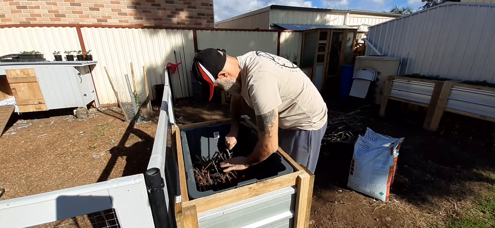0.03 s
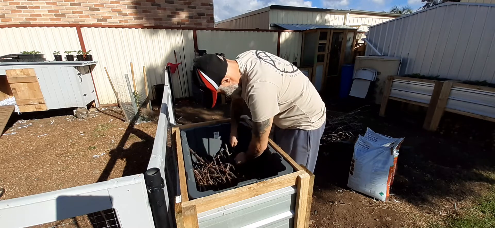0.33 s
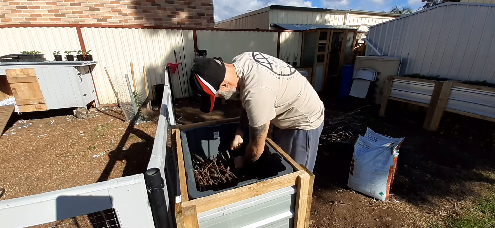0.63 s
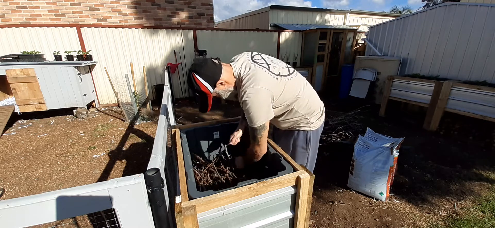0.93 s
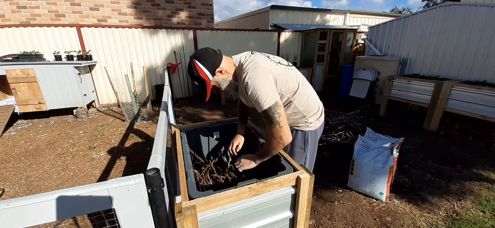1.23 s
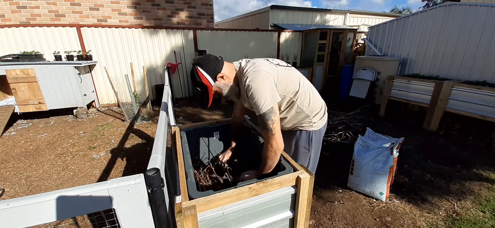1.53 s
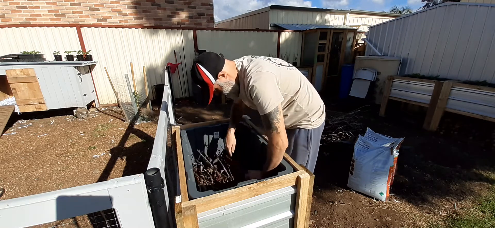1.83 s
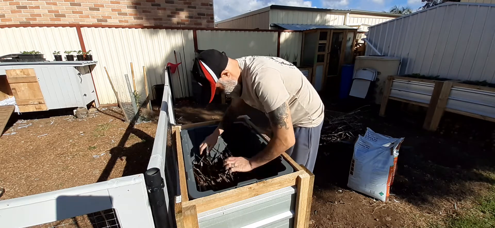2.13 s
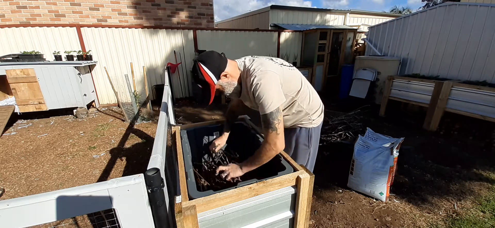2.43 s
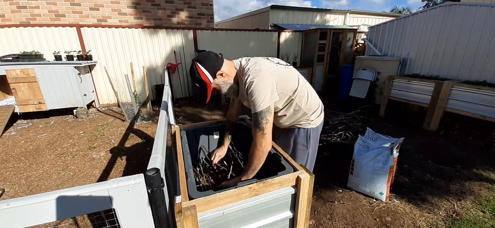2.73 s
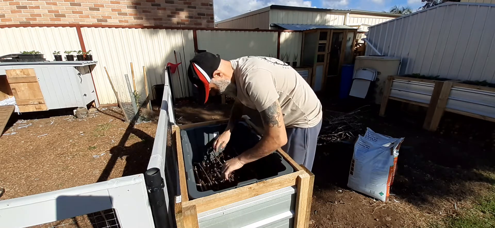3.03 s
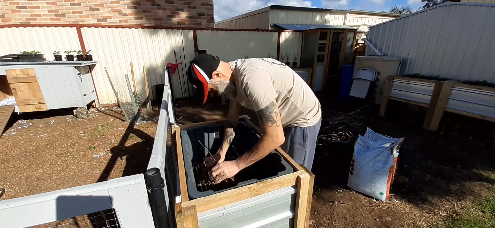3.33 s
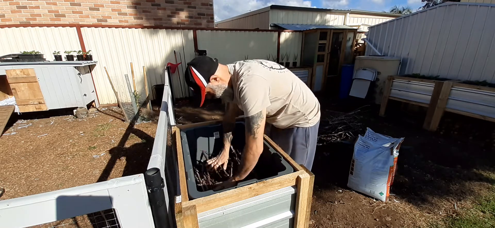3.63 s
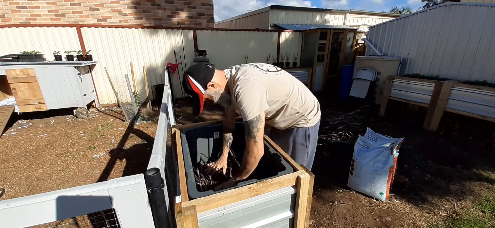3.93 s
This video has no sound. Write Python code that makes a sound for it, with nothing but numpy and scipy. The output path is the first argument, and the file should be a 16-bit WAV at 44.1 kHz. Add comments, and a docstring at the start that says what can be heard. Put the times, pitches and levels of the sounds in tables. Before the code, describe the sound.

In a quiet yard, hands shift a pile of sticks, which knock, scrape and crackle over the dull boom of a raised garden bed. A brief squeak comes past the middle. The sound sits a little left in stereo.

```python
"""Dry litter rustles and sticks clatter as hands rummage in a lined, raised garden bed outdoors.
The hollow bed booms under the shifting pile and bark rasps as it rubs. Sticks knock and ring,
twigs snap, and sliding sticks judder and, later, squeak. The walls scatter the sounds briefly.
The bed stands in a quiet yard, a little to the left of a stereo pair of microphones."""
import sys
import numpy as np
from scipy import signal
from scipy.io import wavfile
from scipy.ndimage import uniform_filter1d

SR = 44100
rng = np.random.default_rng(int(sys.argv[2]) if len(sys.argv) > 2 else 0)


def master_out(mix):
    """Clip the mix to full scale and print it as 16-bit PCM to the path in sys.argv[1]."""
    frames = np.transpose(np.atleast_2d(mix))
    ceiling = np.clip(frames, -1, 1)
    pcm = np.round(ceiling * 32767).astype(np.int16)
    wavfile.write(sys.argv[1], SR, pcm)


N = 176400
TIME = np.arange(N) / SR
LEFT_LEAD_S, LEFT_LOUDER_DB, LEFT_TREBLE_DB = 0.00011, 3, 2.5  # left microphone against right


def from_db(db):
    """Decibels to gain."""
    return 10 ** (np.asarray(db) / 20)


def unit_rms(x):
    """Scale to rms 1."""
    return x / np.sqrt(np.mean(x ** 2) + 1e-20)


def band(x, low_hz, high_hz):
    """Second-order band-pass."""
    high_hz = min(high_hz, .47 * SR)
    low_hz = min(low_hz, high_hz / 2 ** .25)
    return signal.sosfilt(signal.butter(2, [low_hz, high_hz], "band", fs=SR, output="sos"), x + 1e-18)


def resonance(x, hz, width_hz):
    """Two-pole resonance with gain 1 at its peak."""
    r = np.exp(-np.pi * width_hz / SR)
    feedback = [1, -2 * r * np.cos(2 * np.pi * hz / SR), r * r]
    return signal.lfilter(np.array([1, 0, -1]) * (1 - r * r) / 2, feedback, x + 1e-18)


def coloured(excite, spectrum):
    """Half-octave bands over the span of a spectrum, each with its own excitation; rms 1."""
    hz, db = np.transpose(spectrum)
    edges = 22 * 2 ** np.arange(0, 10.1, .5)
    out = 0
    for low, high in zip(edges, edges[1:]):
        if high > hz[0] and low < hz[-1]:
            band_db = np.interp(np.log(low * high) / 2, np.log(hz), db)
            out = out + from_db(band_db) * band(excite(), low, high)
    return unit_rms(out)


def add(out, start, sound):
    """Mix a sound in at a time in seconds."""
    i = max(int(start * SR), 0)
    out[i:i + len(sound)] += sound[:max(N - i, 0)]


def level_curves(rows):
    """Join timed levels into one curve for each level column."""
    times, *levels = np.transpose(rows)
    return [np.interp(TIME, times, db) for db in levels]


def shower(per_s, spread_db):
    """Random impulses: many small ones, a few large."""
    return (rng.random(N) < per_s / SR) * from_db(spread_db * np.minimum(rng.exponential(1, N), 4))


def evened(x, window_s):
    """Hold the slow level at 1 and keep the grain."""
    size = int(window_s * SR)
    power = uniform_filter1d(uniform_filter1d(np.mean(x ** 2, axis=0), size), size)
    return x / np.sqrt(np.abs(power) + 1e-6)


def at_microphones(x):
    """The direct sound reaches the left microphone first."""
    return np.array([x, np.roll(x, round(LEFT_LEAD_S * SR))])


# The hollow bed's resonances. Each row: frequency in Hz, width in Hz, lift in dB.
BED_MODES = [(92, 17.6, 5), (185, 49, 5), (322, 10.5, 2), (540, 6.8, 5), (739, 35, 6), (1157, 31, 3.5)]


def in_bed(x, scatter_db, t60):
    """The bed colours a sound; its walls scatter it, alike at both microphones only in the lower range."""
    x = x + sum((from_db(db) - 1) * resonance(x, hz, width) for hz, width, db in BED_MODES)
    t = TIME[:SR // 3]
    noise = rng.standard_normal((3, len(t))) * from_db(-60 * t / t60)
    tail = (band(noise[0], 111, 1300) + band(noise[1:], 790, 2600)) / np.sqrt(np.sum(noise[0] ** 2))
    scattered = signal.fftconvolve(x[None], tail, axes=1)[:, :N]
    return at_microphones(x) + from_db(scatter_db) * scattered


def fibre_hiss():
    """Noise of dry fibres: a direct part, and a scattered part that differs at each microphone."""
    return at_microphones(rng.standard_normal(N)) + rng.standard_normal((2, N))


def friction(spectrum, per_s, spread_db, t60, tint_db):
    """Every slip frees a short, dying burst of noise with a colour of its own."""
    slips = shower(per_s, spread_db)

    def bursts():
        sizes = slips.copy()
        sizes[slips > 0] *= from_db(tint_db * rng.standard_normal(np.count_nonzero(slips)))
        power = signal.lfilter([1], [1, -from_db(-120 / (t60 * SR))], sizes ** 2 + 1e-18)
        return np.sqrt(power) * fibre_hiss()
    return evened(coloured(bursts, spectrum), window_s=0.047)


# The colours of bark and of litter. Each row: frequency in Hz, relative spectral density in dB.
RASP_SPECTRUM = [(800, -16), (1250, 1), (1900, -3.5), (2600, -7.5), (3400, -15), (5000, -23.5)]
RUSTLE_SPECTRUM = [(2400, -2.5), (3800, 4), (9500, -4), (12500, 5), (16000, -7)]
# How hard things rub. Each row: time in seconds, relative levels of rasp and of rustle in dB.
RUBBING_LEVELS = [(0.0, -48, -55), (.2, -70, -69), (0.305, -60, -67), (0.315, -46, -61), (0.47, -68, -74),
                  (0.77, -45, -43), (0.82, -58, -65), (0.95, -53, -56), (1.35, -80, -83), (1.41, -50, -51),
                  (1.58, -45, -53), (1.64, -34, -42), (1.7, -32, -44), (1.81, -49.5, -55), (2.08, -57, -61),
                  (2.19, -71, -73), (2.22, -59, -60), (2.47, -46, -52), (2.62, -52, -63), (2.71, -39, -46),
                  (2.82, -41, -47.5), (2.86, -55, -61), (2.99, -47, -53), (3.27, -69, -74),
                  (3.28, -53.5, -53.5), (3.46, -60.5, -66), (3.69, -37, -43.5), (3.77, -50, -55),
                  (3.84, -42, -44), (3.915, -48, -55), (3.93, -44, -42), (3.97, -35, -42), (4.0, -49, -52)]


def rubbing():
    """Bark rasps and litter rustles in hundreds of tiny slips a second."""
    rasp_db, rustle_db = level_curves(RUBBING_LEVELS)
    rasp = friction(RASP_SPECTRUM, per_s=300, spread_db=2.7, t60=0.062, tint_db=6)
    rustle = friction(RUSTLE_SPECTRUM, per_s=450, spread_db=3.5, t60=0.12, tint_db=5)
    return from_db(rasp_db + 1) * rasp + from_db(rustle_db + 3.5) * rustle


def contacts(spectrum, per_s, scatter_db, t60):
    """Small blows of wood, each with its own size and colour, sound in the bed."""
    clicks = shower(per_s, spread_db=3.5)
    wood = coloured(lambda: clicks * rng.standard_normal(N), spectrum)
    return evened(in_bed(wood, scatter_db, t60), window_s=0.035)


# The colours of the bed and of the sticks. Each row: frequency in Hz, relative spectral density in dB.
BOOM_SPECTRUM = [(40, -42), (55, -36), (75, -6), (110, -3.5), (140, 0), (210, -2.5), (300, -7.5),
                 (420, -19.5)]
CLATTER_SPECTRUM = [(200, -35), (320, 1.5), (500, 3), (750, -5), (1100, -11.5), (1600, -19.5)]
# How hard the pile shifts. Each row: time in seconds, relative levels of boom and of clatter in dB.
SHIFTING_LEVELS = [(0.0, -46, -43), (.07, -49, -46), (0.1, -37, -40), (0.21, -54, -61), (.26, -41, -43),
                   (0.33, -39, -40), (0.47, -50, -56), (0.75, -49, -49), (0.79, -37, -39), (0.83, -49, -52),
                   (1.04, -44, -47), (1.34, -59, -73), (1.4, -42, -43), (1.62, -32, -31), (1.67, -25, -27),
                   (1.92, -41, -47), (1.99, -35, -35), (2.2, -54, -61), (2.25, -38, -44), (2.33, -42, -47),
                   (2.68, -37, -42), (2.71, -27, -29), (2.92, -42, -41), (3.03, -34, -39), (3.27, -60, -68),
                   (3.29, -36, -42), (3.53, -50, -54), (3.56, -36, -35), (3.99, -28, -32)]


def shifting_pile():
    """Tumbling sticks clatter, and the hollow bed booms under them."""
    boom_db, clatter_db = level_curves(SHIFTING_LEVELS)
    boom = contacts(BOOM_SPECTRUM, per_s=260, scatter_db=-7.5, t60=.12)
    clatter = contacts(CLATTER_SPECTRUM, per_s=340, scatter_db=-4, t60=0.089)
    return from_db(boom_db + 0.5) * boom + from_db(clatter_db) * clatter


# The background of the yard. Each row: frequency in Hz, relative spectral density in dB.
AIR_SPECTRUM = [(25, -4), (65, 25), (130, 13), (250, -12), (600, 2), (4000, -33), (16000, -48)]


def yard_air():
    """A steady, low outdoor hush, partly shared by the two microphones."""
    return coloured(lambda: rng.standard_normal(N) + rng.standard_normal((2, N)), AIR_SPECTRUM)


def blows(rows, attack_cycles, chatter_db):
    """Each blow rings a damped tone; loose sticks chatter within an octave of it as it dies."""
    out, t = np.zeros(N), TIME[:SR // 6]
    for start, db, hz, t60 in rows:
        envelope = from_db(-60 * t / t60) * (1 - np.exp(-t * hz / attack_cycles))
        chatter = from_db(chatter_db) * unit_rms(band(rng.standard_normal(len(t)), hz / 2, hz * 2))
        ring = band(envelope * (np.sin(2 * np.pi * hz * t) + chatter), hz / 4, hz * 2.04)
        add(out, start, from_db(db) * ring / np.abs(ring).max())
    return out


# Wood strikes wood. Each row: start in seconds, relative peak in dB, pitch in Hz, t60 in seconds.
STICK_KNOCKS = [(.0775, -17, 596, 0.0044), (.3112, -21, 636, 0.009), (.386, -27.5, 644, 0.0019),
                (.767, -24.5, 503, 0.016), (.9365, -26.5, 503, 0.024), (1.034, -44, 393, 0.021),
                (1.483, -20.5, 667, 0.0071), (1.601, -19.5, 610, 0.0089), (1.639, -10, 500, 0.0046),
                (1.69, -19, 1190, 0.0062), (1.695, -15, 490, 0.016), (1.973, -29, 433, 0.032),
                (2.017, -23.5, 517, 0.097), (2.554, -29, 527, 0.032), (2.701, -17, 710, 0.0046),
                (2.822, -16.5, 446, 0.014), (3.317, -24.5, 450, 0.01), (3.548, -23.5, 480, 0.0062),
                (3.649, -13, 600, 0.023), (3.73, -15, 530, 0.015), (3.897, -18.5, 870, 0.0072)]


def knocks():
    """Sticks knock sharply on each other and on the wall of the bed."""
    return blows(STICK_KNOCKS, attack_cycles=0.13, chatter_db=-4)


def crackles(per_s=22, over_rustle_db=9.5, low_hz=2500, high_hz=13000, t60=0.016):
    """Lone twig ends break at random, as loud as the rubbing is hard; gives rows for snaps()."""
    _, rustle_db = level_curves(RUBBING_LEVELS)
    rows = []
    for when, softness, pitch in rng.random((int(per_s * N / SR), 3)):
        db = rustle_db[int(when * N)] + over_rustle_db - 10 * softness
        rows.append((when * TIME[-1], db, low_hz * (high_hz / low_hz) ** pitch, t60))
    return rows


# Twigs and leaves crack. Each row: start in seconds, relative peak in dB, centre in Hz, t60 in seconds.
TWIG_SNAPS = [(.3103, -33.5, 2440, 0.011), (0.5008, -25, 1600, 0.038), (.6875, -25, 11000, 0.011),
              (0.7028, -21, 11500, .025), (.717, -25.5, 12500, 0.099), (0.766, -24, 3530, 0.039),
              (0.882, -33, 2900, 0.025), (0.916, -30.5, 5000, 0.054), (1.604, -23, 10900, 0.046),
              (1.634, -19, 4350, 0.045), (1.7085, -17, 13200, 0.033), (1.9, -33.5, 4300, 0.037),
              (2.022, -37.5, 12000, 0.083), (2.378, -24.5, 5800, 0.026), (2.69, -31, 2220, .03),
              (3.279, -41.5, 7000, 0.11), (3.873, -20.5, 9750, 0.011), (3.926, -25.5, 13000, .04)]


def snaps():
    """Dry fibres break in a short, dying burst."""
    out, t, noise = np.zeros((2, N)), TIME[:SR // 10], fibre_hiss()
    for start, db, hz, t60 in list(TWIG_SNAPS) + crackles():
        samples = (int(start * SR) + np.arange(len(t))) % N
        burst = noise[:, samples] * from_db(-60 * t / t60)
        crack = band(resonance(burst, hz, hz * 0.73), hz / 4, hz * 2.5)
        for side, sound in zip(out, from_db(db) * crack / np.abs(crack).max()):
            add(side, start, sound)
    return out


# A dry stick's bending modes. Each row: multiple of the pitch, relative level in dB.
BENDING_MODES = [(.72, -7.5), (1, 5.5), (1.22, 1.5), (1.56, -7.5)]
# Dry sticks clack. Each row: start in seconds, relative peak in dB, pitch in Hz, t60 in seconds.
STICK_CLACKS = [(.3103, -20.5, 1900, .025), (.7665, -25, 1750, .016), (1.549, -19.5, 1100, .025)]


def clacks():
    """A free stick rings in several bending modes, the higher ones dying sooner."""
    out, t = np.zeros(N), TIME[:SR // 6]
    for start, db, hz, t60 in STICK_CLACKS:
        ring = 0
        for k, (ratio, mode_db) in enumerate(BENDING_MODES):
            envelope = from_db(mode_db - 60 * t * np.sqrt(ratio) / t60)
            ring = ring + (-1) ** k * envelope * np.sin(2 * np.pi * hz * ratio * t)
        add(out, start, from_db(db) * ring / np.abs(ring).max())
    return out


# Sticks judder along each other and the wall.
# Each row: start and length in seconds, relative rms level in dB, pitch and resonance width in Hz.
STICK_SCRAPES = [(0.605, 0.043, -48.5, 1610, 1500), (0.91, 0.017, -42, 2300, 1300),
                 (0.967, 0.025, -46, 1070, 1390), (1.074, 0.028, -56.5, 1060, 1120),
                 (1.624, 0.092, -42, 1880, 2380)]


def scrapes(slips_per_s=900):
    """Uneven slips ring the stick under a swelling stroke."""
    out = np.zeros(N)
    for start, length, db, hz, width in STICK_SCRAPES:
        slips = (rng.random(SR // 10) < slips_per_s / SR) * rng.standard_normal(SR // 10)
        tone = resonance(resonance(slips, hz, width), hz, width * 2)[:int(length * SR)]
        add(out, start, from_db(db) * unit_rms(tone * signal.windows.tukey(len(tone))))
    return out


# Low bumps in the bed. Each row: start in seconds, relative peak in dB, pitch in Hz, t60 in seconds.
FLOOR_THUMPS = [(1.645, -17, 196, 0.031), (1.835, -23.5, 173, 0.024), (2.2235, -20, 245, 0.03),
                (2.7, -20.5, 196, 0.045), (2.822, -23, 238, 0.022), (3.019, -24.5, 181.5, 0.12),
                (3.28, -26, 211, 0.065), (3.948, -26, 196, 0.034), (3.975, -25, 232, 0.022)]


def thumps():
    """The pile bumps the floor of the bed, which answers with a dull note."""
    return blows(FLOOR_THUMPS, attack_cycles=0.28, chatter_db=-7)


# Bark squeaks on bark. Each row: start and length in seconds, relative rms level in dB, pitch in Hz.
BARK_SQUEAKS = [(2.724, .026, -40, 2410), (2.757, .048, -29, 1370)]


def squeaks(jitter=.06, waver_hz=170):
    """Stick-slip locks onto one mode of a stick: a short swelling tone with an unsteady pitch."""
    out = np.zeros(N)
    for start, length, db, hz in BARK_SQUEAKS:
        waver = unit_rms(band(rng.standard_normal(SR // 4), waver_hz / 2, waver_hz * 2))
        pitch_hz = hz * (1 + jitter * waver[-int(length * SR):])
        tone = np.sin(2 * np.pi * np.cumsum(pitch_hz) / SR)
        add(out, start, from_db(db) * unit_rms(tone * signal.windows.hann(len(tone))))
    return out


def scene():
    """The bed lies a little left of the microphones, louder and brighter on that side, in a quiet yard."""
    sticks = knocks() + clacks() + scrapes() + squeaks()
    floor = thumps()
    bed = shifting_pile() + rubbing() + snaps()
    bed += in_bed(sticks, scatter_db=-4, t60=0.072)
    bed += in_bed(floor, scatter_db=-11.5, t60=.14)
    bed[0] += (from_db(LEFT_TREBLE_DB) - 1) * resonance(bed[0], hz=12900, width_hz=3300)
    balance = from_db([[LEFT_LOUDER_DB / 2], [-LEFT_LOUDER_DB / 2]])
    return bed * balance + from_db(-58.5) * yard_air()


def record(dry):
    """The recorder rolls off the bass below 45 Hz and cuts the top steeply at 16.1 kHz."""
    low_cut = signal.butter(2, 45, "high", fs=SR, output="sos")
    high_cut = signal.ellip(10, .2, 80, 16100, fs=SR, output="sos")
    return signal.sosfilt(high_cut, signal.sosfilt(low_cut, dry))


dry = scene()
out = record(dry)
master_out(out)
```